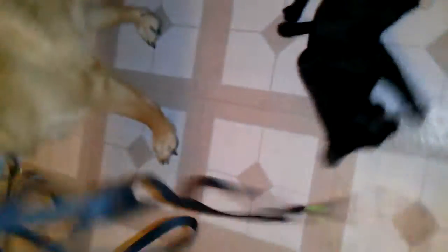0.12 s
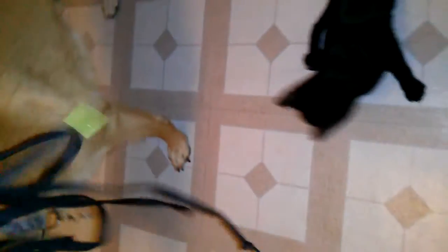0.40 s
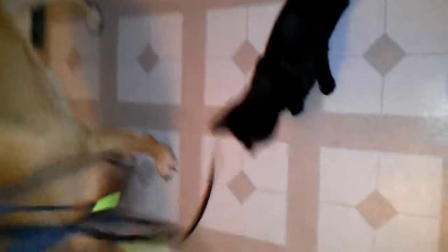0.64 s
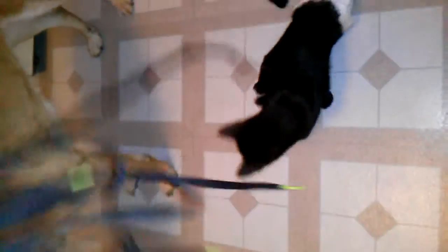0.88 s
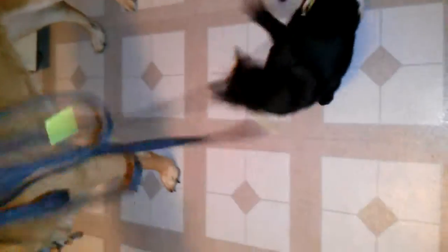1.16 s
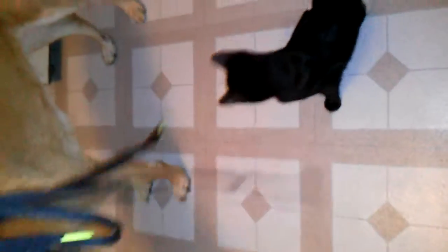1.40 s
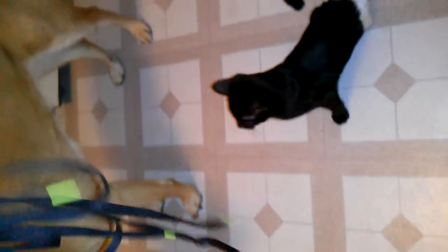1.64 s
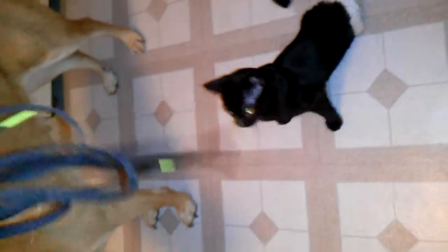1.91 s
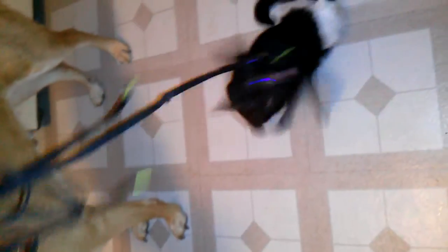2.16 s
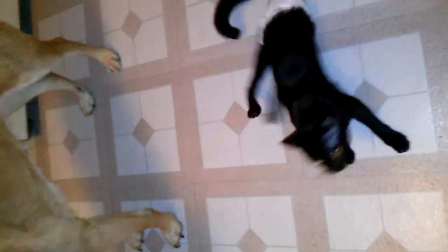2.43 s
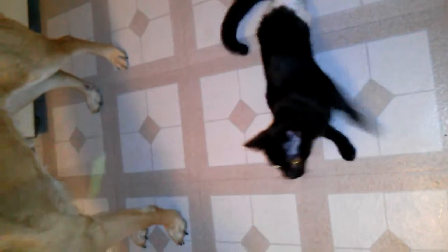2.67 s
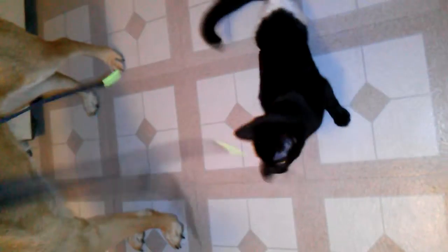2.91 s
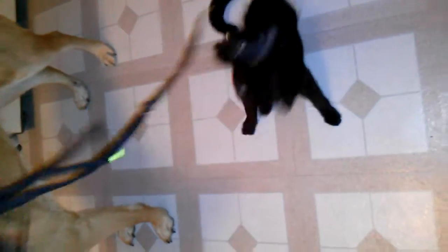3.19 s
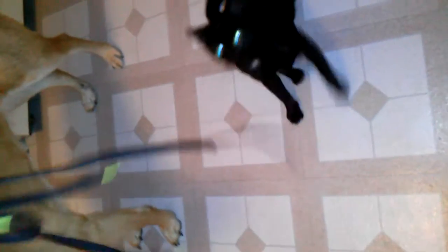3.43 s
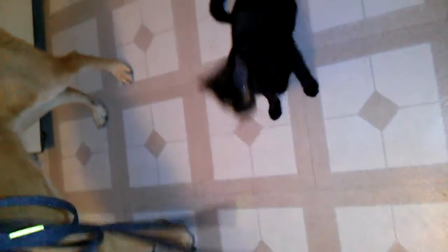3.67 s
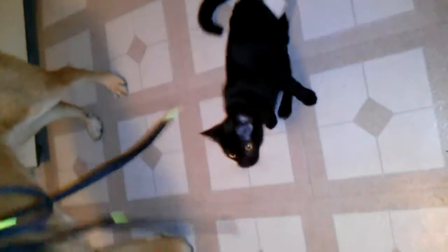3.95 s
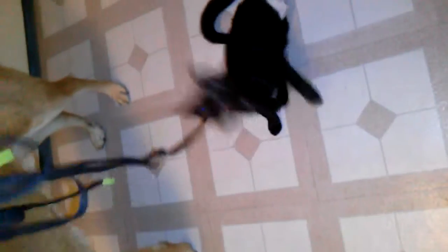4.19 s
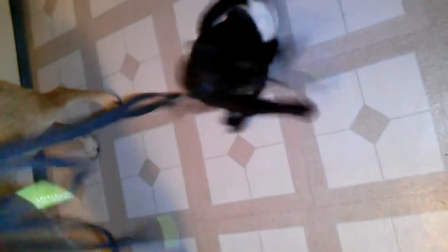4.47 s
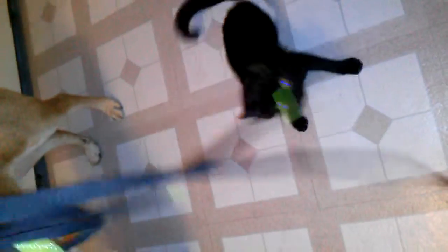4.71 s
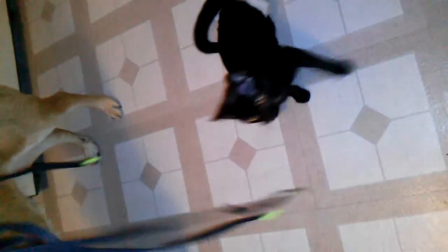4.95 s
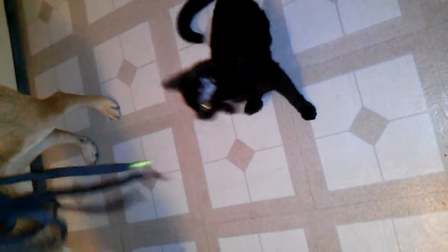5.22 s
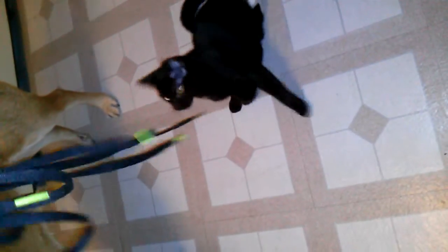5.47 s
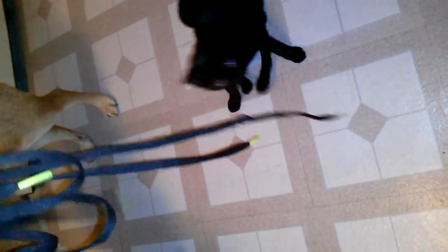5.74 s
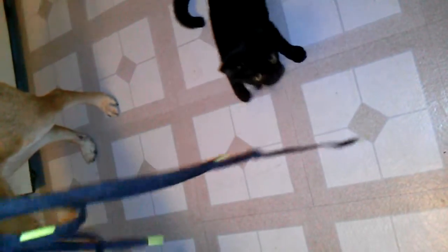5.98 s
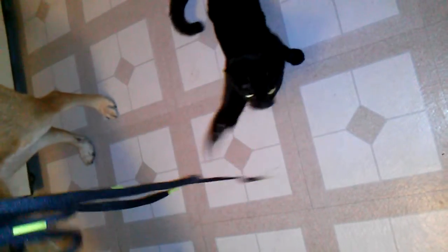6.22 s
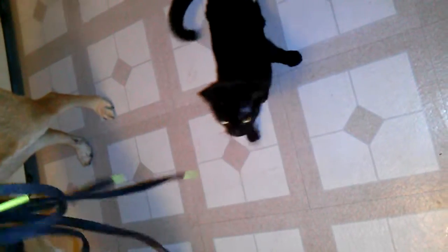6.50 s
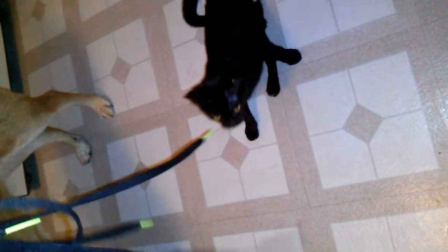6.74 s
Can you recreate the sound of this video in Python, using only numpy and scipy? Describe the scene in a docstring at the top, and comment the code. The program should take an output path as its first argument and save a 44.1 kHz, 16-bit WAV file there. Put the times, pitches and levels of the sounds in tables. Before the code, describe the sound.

Three bursts of dull paw thumps and crisp clicking taps on a hard indoor floor, with faint strap drags and soft steps between them.

```python
"""A cat pounces on a strap that is trailed over the hard floor of a small room.
First comes a flurry of taps and paw thumps, hardest at about half a second, then a lone tap and the dragging strap.
A second pounce lands near 2.4 s, soft steps follow, a third lands near 4.6 s and soft thumps end the scene.
Thumps are soft pushes ringing floor modes; taps are noise cracks with a ring; drags are resonant rubbing noise.
Throughout, room noise and strap rustle swell and sink around the sounds, over a faint steady hiss."""
import sys
import numpy as np
from scipy import signal
from scipy.fft import rfft, irfft, next_fast_len
from scipy.io import wavfile
from scipy.ndimage import uniform_filter1d

SR = 44100
rng = np.random.default_rng(int(sys.argv[2]) if len(sys.argv) > 2 else 0)


def elevation(decibels):
    """Turn decibel levels (scalar or array-like) into linear amplitude ratios."""
    levels = np.asarray(decibels, float)
    return 10 ** (levels / 20)


def store_wav(level_fs):
    """Save 16-bit WAV to argv[1]."""
    pcm = np.round(np.clip(np.atleast_2d(level_fs), -1, 1) * 32767)
    wavfile.write(sys.argv[1], SR, pcm.T.astype(np.int16))


N = 303011   # length [samples]


def rms_one(x):
    """Scale to rms 1."""
    return x / np.sqrt(np.mean(x ** 2) + 1e-20)


def in_time(rows):
    """Read the columns of a curve table sample by sample."""
    s, *columns = np.transpose(rows)
    return [np.interp(np.arange(N) / SR, s, column) for column in columns]


def at_hz(points, hz):
    """Read a spectrum table on a log-frequency axis."""
    table_hz, table_db = np.transpose(points)
    return np.interp(np.log(hz), np.log(table_hz), table_db)


def summed_db(*levels_db):
    """Add levels as powers."""
    return 10 * np.log10(sum(elevation(v) ** 2 for v in levels_db))


def drift(rate_hz):
    """Slow random wander of rms 1: white noise through two equal low-pass poles."""
    hop = 40   # samples per slow step
    r = np.exp(-2 * np.pi * rate_hz * hop / SR)
    white = rng.standard_normal(N // hop + 2002)
    slow = signal.lfilter([1], [1, -2 * r, r * r], white)[2000:]   # settled part
    return np.interp(np.arange(N) / hop, np.arange(len(slow)), rms_one(slow))


EDGES_HZ = 25 * 2 ** np.arange(0, 9.4, 1 / 3)


def bands(size):
    """Third-octave bands of noise, neighbours unrelated: (centre [Hz], noise)."""
    white = rng.standard_normal((2, size))
    for k, (low, high) in enumerate(zip(EDGES_HZ, EDGES_HZ[1:])):
        sos = signal.butter(2, [low, high], "band", fs=SR, output="sos")
        yield np.sqrt(low * high), signal.sosfilt(sos, white[k % 2])


def coloured_noise(spectrum, patchy_db):
    """Noise of a given spectrum whose bands flicker on their own; rms 1."""
    total = np.zeros(N)
    for hz, band in bands(N):
        total += elevation(at_hz(spectrum, hz) + patchy_db * drift(18)) * band
    return rms_one(total)


def resonance(x, hz, width_hz):
    """Two-pole band of gain 1 at its top."""
    r = np.exp(-np.pi * width_hz / SR)
    poles = [1, -2 * r * np.cos(2 * np.pi * hz / SR), r * r]
    return signal.lfilter([(1 - r * r) / 2, 0, (r * r - 1) / 2], poles, x)


def double_resonance(x, hz, width_hz):
    """The same resonance twice over, for steeper skirts."""
    return resonance(resonance(x, hz, width_hz), hz, width_hz)


def add(out, s, sound):
    """Mix a sound in at a time."""
    at = round(s * SR)
    out[at:at + len(sound)] += sound[:N - at]


# Shape of the steady hiss: (frequency [Hz], relative density [dB per Hz])
HISS_SPECTRUM = [(100, -2), (1000, -15.5), (5000, -13), (16000, -16.5)]


def hiss():
    """Faint steady noise, shaped in the spectrum."""
    white = rng.standard_normal(next_fast_len(N))
    hz = np.maximum(np.fft.rfftfreq(len(white), 1 / SR), 100)
    shaped = irfft(rfft(white) * elevation(at_hz(HISS_SPECTRUM, hz)), len(white))[:N]
    return elevation(-80.5) * rms_one(shaped)


# Swells of the background noise: (time of the peak [s], low noise level [dB], treble noise level [dB], length [s])
NOISE_SWELLS = [(0.043, -54, -39, 0.19), (0.165, -41.5, -55.5, 0.28), (.325, -38, -44, 0.17),
                (0.505, -36.5, -45, 0.061), (1.08, -56, -67, 0.073), (1.32, -59.5, -63.5, 0.4),
                (1.494, -50.5, -82, 0.06), (1.68, -52, -65.5, 0.17), (1.827, -51.5, -66, 0.14),
                (2.066, -53.5, -72, 0.18), (2.195, -61, -64, 0.21), (2.28, -54, -51, 0.11),
                (2.33, -43, -45.5, 0.091), (2.42, -59, -50.5, 0.088), (2.514, -39.5, -55, 0.17),
                (2.782, -55, -84, 0.084), (3.199, -53.5, -74, 0.13), (3.368, -55.5, -56, 0.19),
                (3.512, -57.5, -60, 0.17), (3.709, -55.5, -62, 0.091), (3.816, -56.5, -75.5, 0.13),
                (3.955, -54, -79.5, 0.067), (4.054, -57.5, -80.5, 0.064), (4.304, -57, -64, 0.26),
                (4.499, -55, -53, 0.063), (4.692, -41, -41, 0.13), (4.809, -52, -52.5, 0.098),
                (5.142, -62, -80.5, 0.054), (5.26, -58, -64, 0.16), (5.442, -50.5, -62, 0.14),
                (5.828, -54, -61.5, 0.14), (6.062, -56.5, -76, .08), (6.262, -58.5, -76, 0.11),
                (6.388, -51, -66.5, 0.071), (6.562, -51, -67, 0.088), (6.628, -49, -60.5, 0.075)]


def swell_levels():
    """Low noise and treble noise rise and sink together in each swell; gives both levels in dB."""
    rise_share, edge_db = .7, 24   # rise time against length; level lost at the ends
    roundness = 1.2   # 1 = pointed peak, 2 = rounded top
    t, power = np.arange(0, N, 64) / SR, 0
    for s, low_db, treble_db, length in NOISE_SWELLS:
        away = np.maximum((s - t) / rise_share, t - s) / max(length, .01)
        lost_db = np.minimum(edge_db * away ** roundness, 200)
        power = power + elevation(np.array([[low_db], [treble_db]]) - lost_db) ** 2
    return [np.interp(np.arange(N) / SR, t, 10 * np.log10(p)) for p in power]


def wake(hits):
    """Level of the hits in dB, held up by a steady fall, for the noise that trails them."""
    fall_db = 167 * np.arange(N) / SR   # 167 dB per s
    size = int(.02 * SR)   # smoothed over 20 ms
    power = np.abs(uniform_filter1d(hits ** 2, size, origin=(size - 1) // 2))
    level_db = 10 * np.log10(power + 1e-14)
    return np.maximum.accumulate(level_db + fall_db) - fall_db


# Broad colour of the room noise: (frequency [Hz], relative density [dB per Hz])
ROOM_SPECTRUM = [(15, -46), (25, -4.5), (129, -3.5), (193, -6.5), (233, -4.5), (340, -11), (410, -1),
                 (482, -19), (552, -12), (1050, -22), (2560, -27), (3170, -35), (4380, -35), (8130, -43),
                 (15500, -42)]
# Hum of the room, through two equal resonances: (frequency [Hz], width of each [Hz], level against the noise [dB])
ROOM_HUM = [(137, 35, -10), (232.5, 26, -8), (409.2, 52, -8.5), (5430, 500, -29)]
# Resting level of the room noise: (time [s], level [dB])
ROOM_REST = [(0.0, -35), (0.2, -42.5), (0.45, -50.5), (0.8, -61), (1.2, -60), (1.6, -55), (1.9, -52),
             (1.99, -65.5), (2.15, -57.5), (2.4, -62), (2.7, -64.5), (3.1, -61.5), (3.4, -58),
             (3.65, -63.5), (4.1, -63.5), (4.4, -58), (5.08, -67), (5.35, -54), (5.7, -65), (6.0, -62),
             (6.15, -68.5), (6.3, -60), (6.87, -58.5)]


def room_noise(low_db, wake_db):
    """Flickering noise and resonant hum, rising in the swells and in the wake of hits."""
    air, hum = rng.standard_normal(N), np.zeros(N)
    whistle = (4370, 240, -25.5)   # columns as in ROOM_HUM
    for hz, width_hz, level_db in [*ROOM_HUM, whistle]:
        hum += elevation(level_db) * rms_one(double_resonance(air, hz, width_hz))
    noise = coloured_noise(ROOM_SPECTRUM, patchy_db=1.73) + hum
    dull = signal.sosfilt(signal.butter(2, 7000, fs=SR, output="sos"), noise)
    rest_db, = in_time(ROOM_REST)
    room_db = summed_db(rest_db, low_db, wake_db - 15.5)
    loudness = np.clip((room_db + 55) / 15, 0, .9)   # loud swells are duller at the top
    flickering_db = room_db + 1.0 * drift(25)
    return elevation(flickering_db) * ((1 - loudness) * noise + loudness * dull)


# Colour of the strap's rustle: (frequency [Hz], relative density [dB per Hz])
RUSTLE_SPECTRUM = [(530, -30.5), (900, 3.5), (977, -3), (1680, -3), (2850, 0), (5850, 0.5), (7760, -19),
                   (8630, -10), (15000, -23)]


def strap_rustle(treble_db, tap_wake_db):
    """Fluttering treble noise of the strap, rising in the swells and in the wake of taps."""
    rest_db = -82.5
    level_db = summed_db(rest_db, treble_db, tap_wake_db - 19.5)
    return elevation(level_db + 1.7 * drift(23)) * coloured_noise(RUSTLE_SPECTRUM, patchy_db=3.0)


def background(wake_db, tap_wake_db):
    """Room noise and strap rustle swell at the same moments, over the steady hiss."""
    low_db, treble_db = swell_levels()
    return room_noise(low_db, wake_db) + strap_rustle(treble_db, tap_wake_db) + hiss()


# Echo decay before the tail's extra drop: (frequency [Hz], t60 [s])
ECHO_DECAY = [(100, 0.27), (400, 0.23), (1500, .42), (5000, 0.24), (12000, 1)]
# Echo colour at the start of the tail: (frequency [Hz], relative level [dB])
ECHO_TONE = [(100, -4), (700, -0.5), (3000, 1.5), (6000, 1.5), (8000, -6), (15000, -22)]


def room(x):
    """Dense echoes dying band by band; the tail then drops away faster and faster."""
    t = np.arange(16384) / SR
    tail = np.zeros(len(t))
    for hz, band in bands(len(t)):
        tail += elevation(at_hz(ECHO_TONE, hz) - 60 * t / at_hz(ECHO_DECAY, hz)) * band
    tail *= np.clip((t - .002) / 0.0021, 0, 1)   # silent for 2 ms, then a quick rise
    tail *= elevation(-600 * np.maximum(t - .03, 0) ** 2)
    return signal.fftconvolve(x, tail / np.sqrt(np.sum(tail ** 2)))[:N]


# Strap dragged along the floor, each resonance applied twice:
# (start [s], length [s], level [dB], lower resonance [Hz], upper resonance [Hz], width of each pass [Hz])
STRAP_DRAGS = [(1.05, 0.084, -67.5, 1370, 2500, 149), (1.428, 0.496, -64, 1910, 2790, 260),
               (2.094, 0.019, -63.5, 1500, 2190, 200)]


def drags():
    """Uneven rubbing noise in two resonances of the strap."""
    rise_db_per_s, fall_db_per_s = 150.5, 350
    out, t = np.zeros(N), np.arange(N) / SR
    for s, length, level_db, lower_hz, upper_hz, width_hz in STRAP_DRAGS:
        rub = rng.standard_normal(N) * elevation(4.3 * drift(23))
        lower = double_resonance(rub, lower_hz, width_hz)
        upper = double_resonance(rub, upper_hz, width_hz)
        before_db = rise_db_per_s * np.maximum(s - t, 0)
        after_db = fall_db_per_s * np.maximum(t - s - length, 0)
        out += elevation(level_db - before_db - after_db) * rms_one(lower + elevation(-7.0) * upper)
    return out


# Colour of a tap's crack before its own tilt: (frequency [Hz], relative level [dB])
CRACK_COLOUR = [(300, 2.5), (800, 10.5), (2200, 5.5), (3300, 5), (5500, 1.5), (7500, -9), (11000, -14.5),
                (16000, -22)]
# Claw and strap-end taps and slaps: (time [s], level before a 7 dB trim [dB], ring [Hz],
# ring against crack [dB], t60, at least 3 ms when played [s], tilt [dB per octave])
TAP_HITS = [(.001, -18, 3100, -10, 0.023, -6.5), (.053, -20, 4600, 1, 0.059, 6.5),
            (0.14, -22.5, 2920, -12, 0.028, -7.5), (0.2827, -25.5, 3420, 1.5, 0.039, 2),
            (0.308, -29.5, 3040, 8.5, 0.11, 2), (.325, -29, 3670, 0, 0.086, -2.5),
            (.507, -7.5, 1016, -1, 0.049, -3), (0.565, -15, 5050, 0.5, 0.035, 1.5),
            (0.571, -6.5, 3180, -14.5, 0.037, 0), (.58, -10, 795, 0.5, .064, -6.5),
            (.599, -30, 9500, -10.5, 0.014, 2), (0.9275, -31, 1690, 1, 0.0083, 5),
            (1.767, -42, 3300, -2, .02, -1.5), (1.816, -34, 2600, 6, 0.021, 2),
            (1.843, -32, 1320, 1, 0.067, -0.5), (1.849, -32.5, 3100, 19, 0.01, -16),
            (2.4479, -11, 3370, 4, 0.025, 0.5), (2.454, -8, 2130, -10, 0.018, -0.5),
            (2.477, -22.5, 3540, 0.5, 0.12, -7.5), (4.4311, -29, 9370, 0, 0.02, 5.5),
            (4.4847, -28, 3900, 3.5, 0.025, 8.5), (4.6184, -28, 630, 1.5, 0.062, -1.5),
            (4.626, -30.5, 1160, -4, 0.029, -0.5), (4.684, -21.5, 1400, -16, 0.026, -3.5),
            (4.694, -20.5, 4450, 0, 0.034, -3)]


def taps():
    """A coloured crack of noise plus a short ring, rising fast and dying; also what each sends to the walls."""
    near, far, t = np.zeros(N), np.zeros(N), np.arange(8192) / SR
    bins_hz = np.maximum(np.fft.rfftfreq(len(t), 1 / SR), 100)
    top = 1 / (1 + (6500 / bins_hz) ** 8)   # share of the spectrum above about 6.5 kHz
    for s, peak_db, hz, ring_db, t60, tilt_db in TAP_HITS:
        rise = max(.07 * t60, 1e-4)
        since_rise = np.maximum(t - rise, 0)
        noise = rng.standard_normal((2, len(t)))
        colour_db = at_hz(CRACK_COLOUR, bins_hz) + tilt_db * np.log2(bins_hz / 3000)
        spectrum = rfft(noise[0]) * elevation(colour_db)
        brief = elevation(-900 * since_rise)   # the treble is gone sooner
        crack = irfft(spectrum * (1 - top)) + brief * irfft(spectrum * top)
        crack /= np.std(irfft(spectrum))
        ring = elevation(ring_db) * rms_one(double_resonance(noise[1], hz, .3 * hz))
        shape = elevation(peak_db - 7.0 - 60 * since_rise / max(t60, .003)) * np.minimum(t / rise, 1)
        shape /= np.hypot(1, elevation(ring_db))   # a strong ring adds no loudness
        add(near, s, shape * (crack + ring))
        echo_db = -8 + 0.067 * peak_db   # louder taps keep a stronger tail
        add(far, s, elevation(echo_db) * shape * (crack + elevation(-4) * ring))
    return near, far


# Floor modes under a paw: (frequency [Hz], level before chance and focus [dB], t60 [s])
FLOOR_MODES = [(82, 8.5, 0.09), (98, -3, 0.27), (151, 7, 0.15), (178, -9, 0.027), (200, 0, 0.17),
               (240, 2.5, .08), (291, 3, 0.067), (332, -0.5, 0.055), (427, -1.5, 0.014), (470, 1, 0.069),
               (561, -2.5, 0.12), (666, -4.5, 0.055), (752, -5, .04), (840, -11, .035)]
# Paws landing, each sound starting 2 ms ahead of its time:
# (time [s], peak level [dB], push t60, at least 2 ms [s], centre [Hz], loss an octave from the centre [dB])
PAW_THUMPS = [(.009, -44, 0.046, 400, -7), (0.115, -35, 0.053, 440, 8), (0.15, -39, 0.059, 363, 20),
              (0.298, -39, 0.031, 200, 2), (0.346, -41, 0.051, 365, 17), (0.491, -29, 0.035, 500, 15),
              (.513, -21, 0.098, 594, -2), (0.526, -17, 0.071, 300, 3), (.549, -24, 0.043, 100, 0),
              (.577, -17.5, 0.073, 247, -3), (0.626, -25, .056, 142, 8), (0.669, -29.5, 0.16, 180, 6),
              (.926, -36.5, 0.02, 200, -2), (1.68, -47, 0.023, 249, 17), (1.849, -57, 0.14, 200, 0),
              (2.233, -23, 0.078, 367, 23), (2.243, -21.5, 0.086, 297, 9.5), (2.274, -22, 0.098, 200, 17),
              (2.292, -27.5, 0.24, 230, 15), (2.451, -21, 0.025, 248, -3), (2.464, -17, 0.051, 398, 2),
              (2.489, -15.5, 0.027, 253, 3.5), (3.166, -44.5, .087, 130, 3.5),
              (3.346, -43, 0.076, 150, 1.5), (3.709, -47, 0.053, 230, -0.5), (4.439, -38, 0.062, 90, 1.5),
              (4.619, -30.5, 0.27, 230, 10), (4.686, -20.5, 0.06, 400, 6), (4.694, -18, .07, 328, 5),
              (4.716, -27.5, 0.13, 303, 1.5), (4.814, -34, 0.076, 150, 1.5), (5.431, -41, 0.034, 221.5, 17),
              (5.787, -43, 0.11, 126, 9), (6.372, -46, .045, 240, 8), (6.544, -36, 0.052, 303, 1),
              (6.601, -37, 0.17, 170, 20), (6.619, -34, 0.1, 300, 2)]


def thumps():
    """A soft uneven push strikes each floor mode with a strength of its own, weighted about a centre pitch."""
    out, t = np.zeros(N), np.arange(8192) / SR
    pad = signal.butter(4, 800, fs=SR, output="sos")   # the soft paw pad drives little above 800 Hz
    for s, peak_db, length, centre_hz, focus_db in PAW_THUMPS:
        shape = np.minimum(t / (0.03 * length), 1) * elevation(-60 * t / max(length, .002))
        push = signal.sosfilt(pad, rng.standard_normal(len(t)) * shape)
        strengths_db = rng.normal(0, 0.88, len(FLOOR_MODES))
        body = np.zeros(len(t))
        for (hz, level_db, t60), extra_db in zip(FLOOR_MODES, strengths_db):
            r, w = elevation(-60 / (t60 * SR)), 2 * np.pi * hz / SR
            gain = elevation(level_db + extra_db - focus_db * np.log2(hz / centre_hz) ** 2)
            body += gain * signal.lfilter([0, np.sin(w)], [1, -2 * r * np.cos(w), r * r], push)
        add(out, s - .002, elevation(peak_db) * body / np.abs(body).max())
    return out


def scene():
    """Hits near the microphone, their echoes, the drags and the background."""
    near, far = taps()
    soft = thumps()
    hits = near + soft
    echoes = room(far + elevation(-6.5) * soft)
    return (hits + echoes + drags() + background(wake(hits), wake(near)))[None]


def low_pass(x):
    """Removes everything above the highest recorded frequency."""
    return signal.sosfilt(signal.butter(12, 16470, fs=SR, output="sos"), x)


def record(dry):
    """The microphone loses the deepest bass, peaks are rounded and the top is cut."""
    bass_cut = signal.butter(2, 58, "high", fs=SR, output="sos")
    top_cut = signal.cheby2(16, 60, 16050, fs=SR, output="sos")
    mix = signal.sosfilt(bass_cut, dry)
    mix = .45 * np.tanh(mix / .45)
    mix = signal.sosfilt(top_cut, mix)
    return low_pass(mix)


dry = scene()
out = record(dry)
store_wav(out)
```